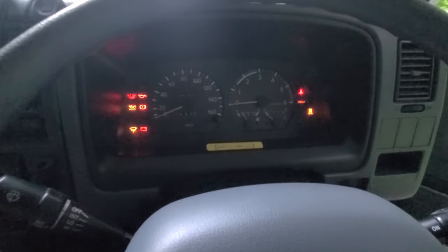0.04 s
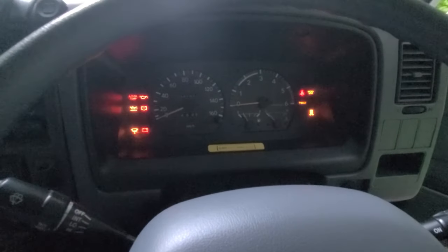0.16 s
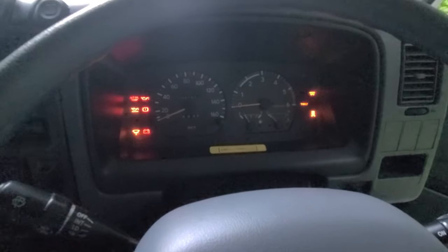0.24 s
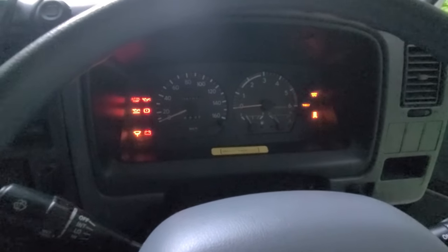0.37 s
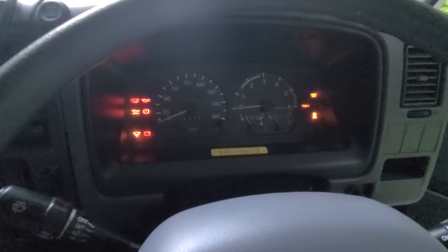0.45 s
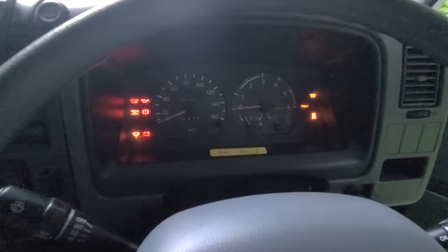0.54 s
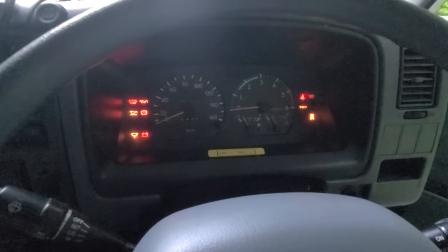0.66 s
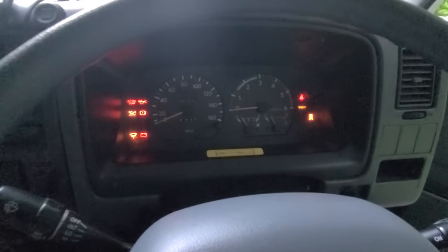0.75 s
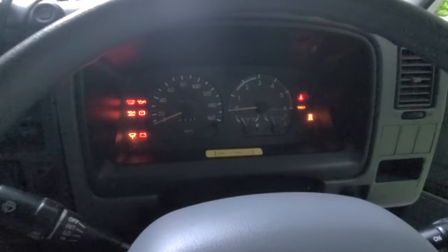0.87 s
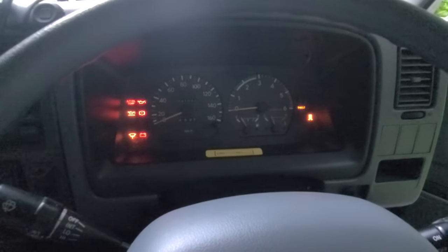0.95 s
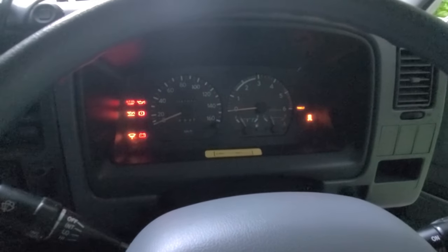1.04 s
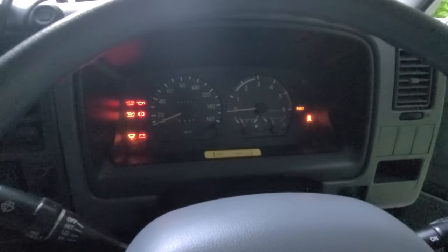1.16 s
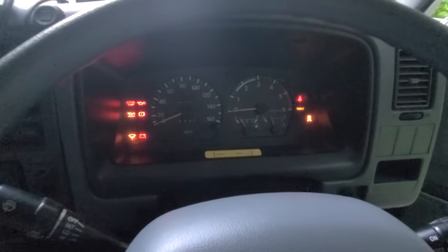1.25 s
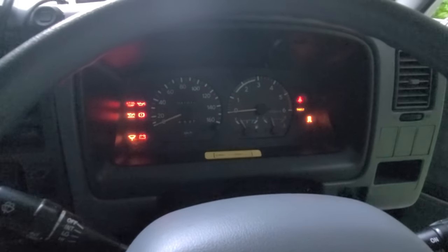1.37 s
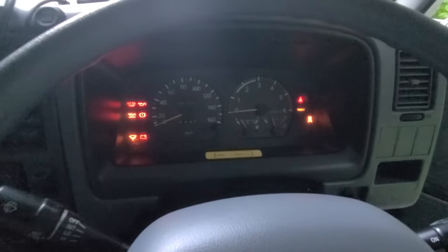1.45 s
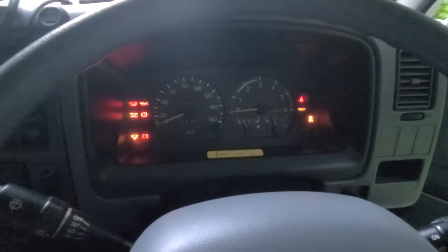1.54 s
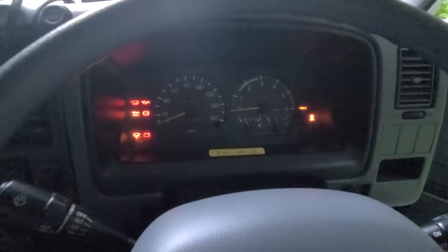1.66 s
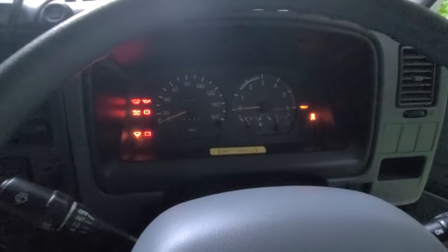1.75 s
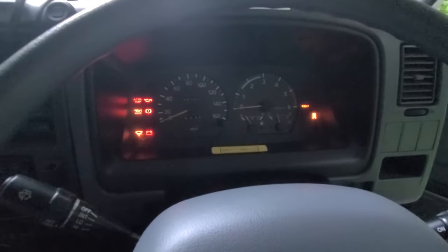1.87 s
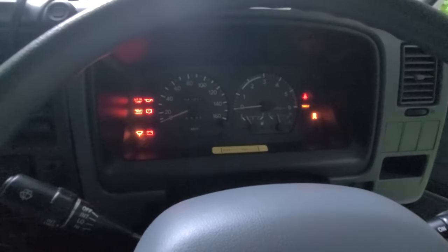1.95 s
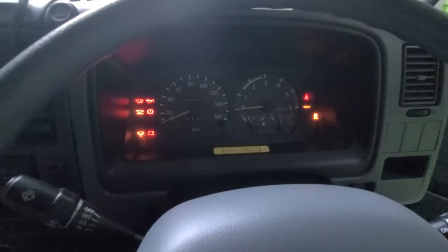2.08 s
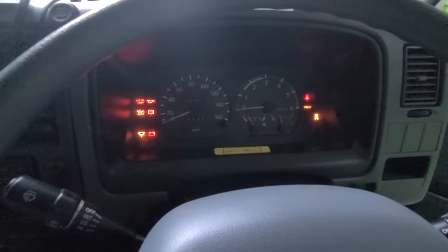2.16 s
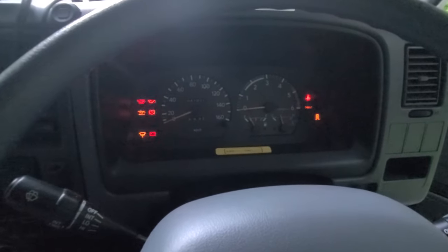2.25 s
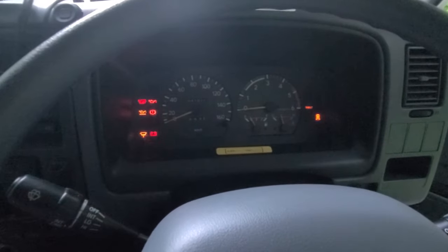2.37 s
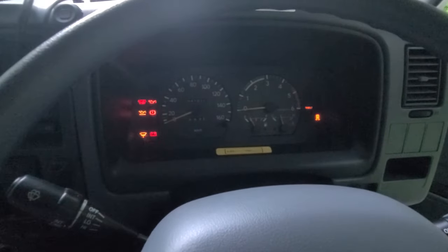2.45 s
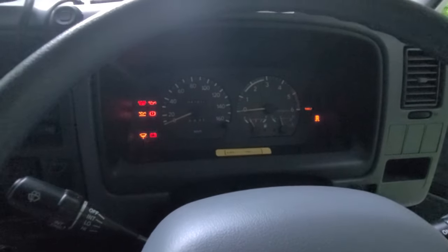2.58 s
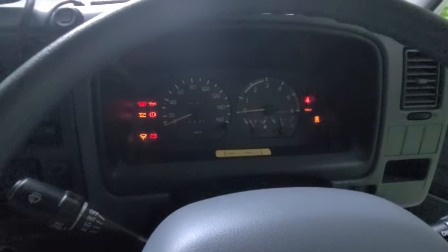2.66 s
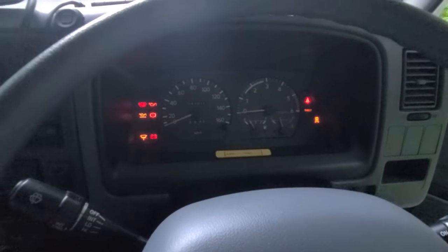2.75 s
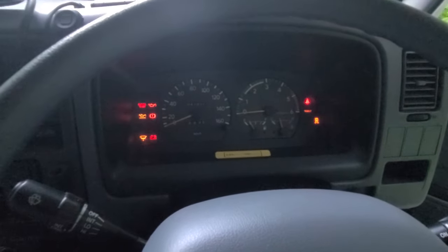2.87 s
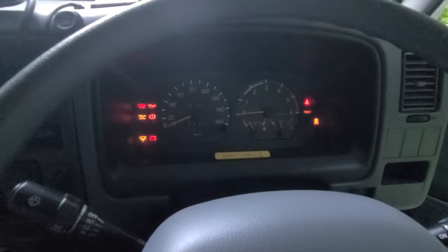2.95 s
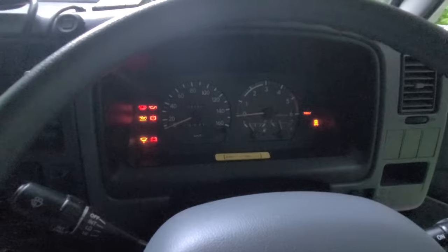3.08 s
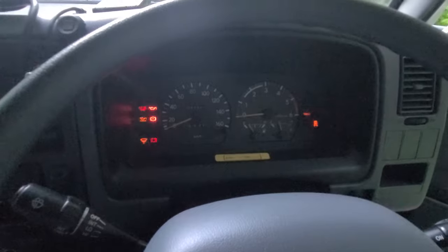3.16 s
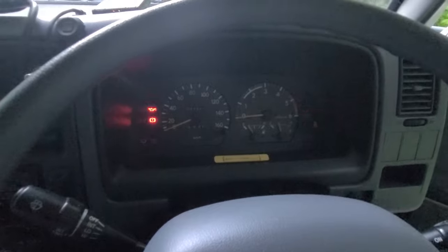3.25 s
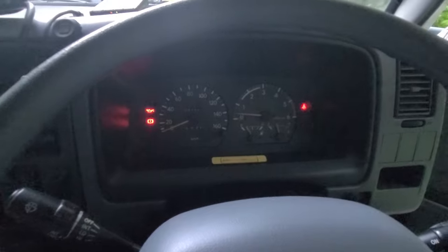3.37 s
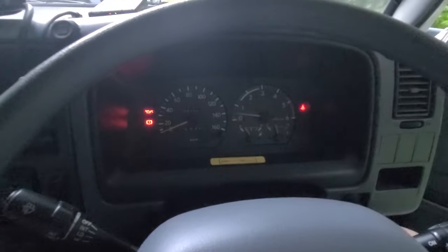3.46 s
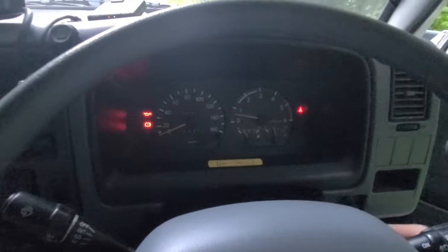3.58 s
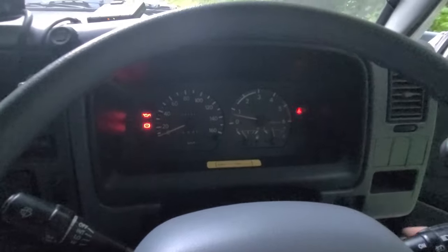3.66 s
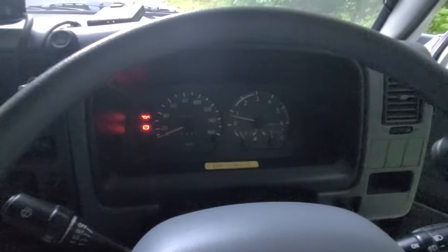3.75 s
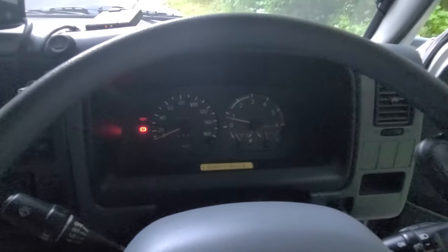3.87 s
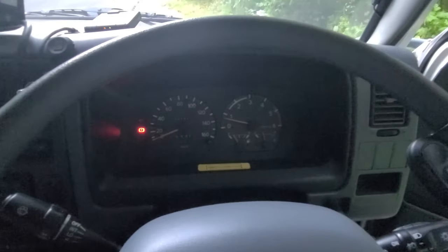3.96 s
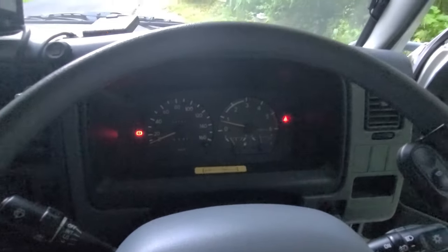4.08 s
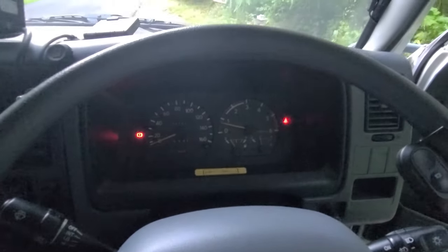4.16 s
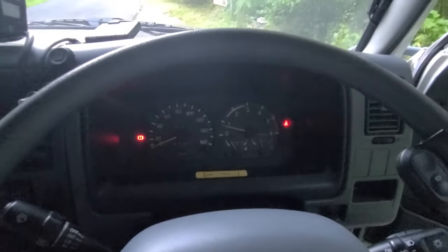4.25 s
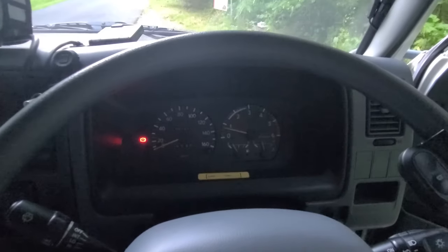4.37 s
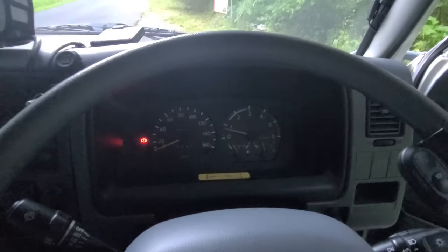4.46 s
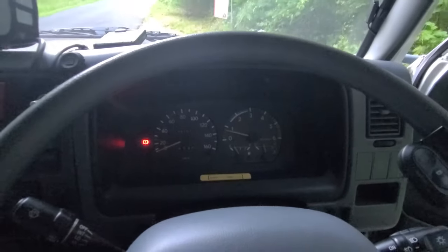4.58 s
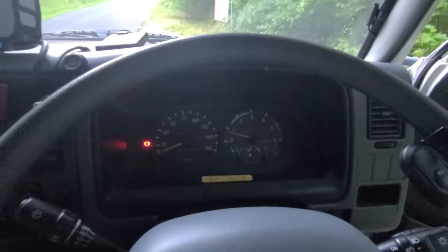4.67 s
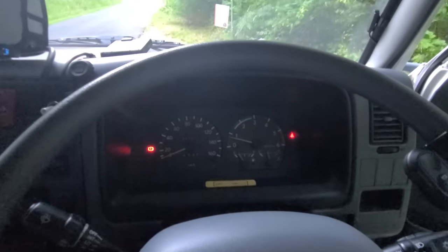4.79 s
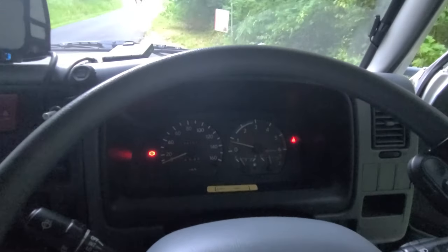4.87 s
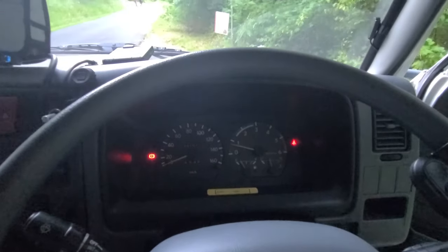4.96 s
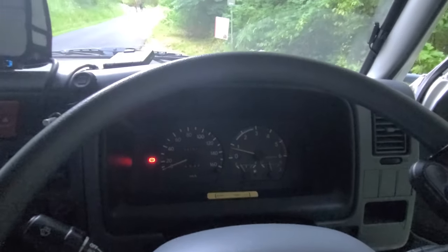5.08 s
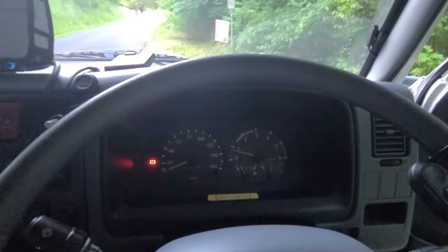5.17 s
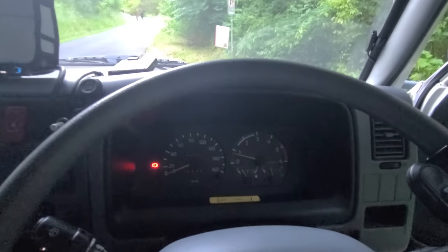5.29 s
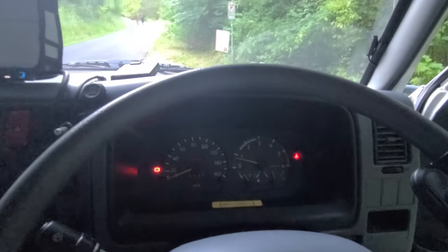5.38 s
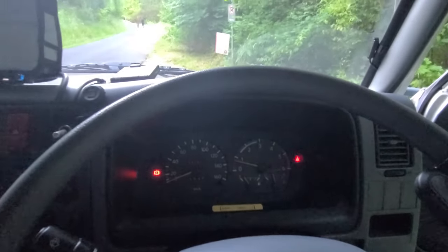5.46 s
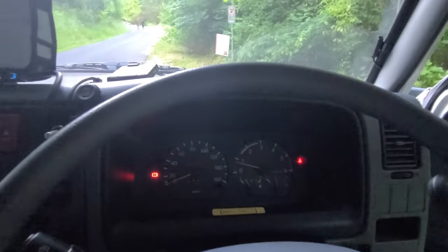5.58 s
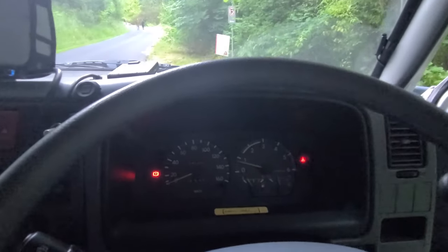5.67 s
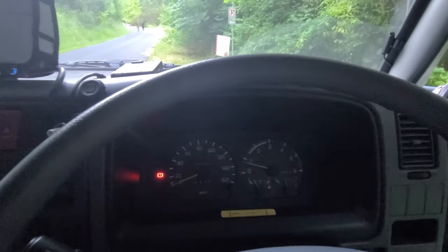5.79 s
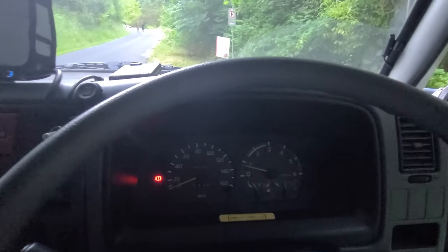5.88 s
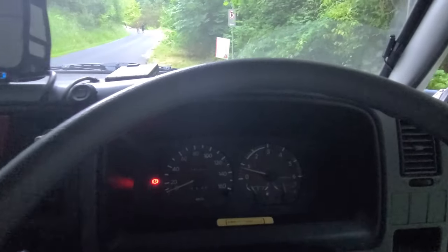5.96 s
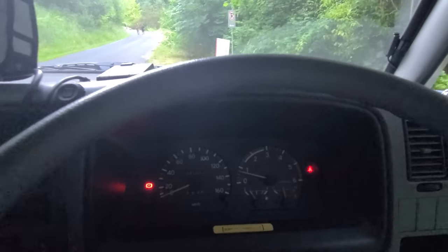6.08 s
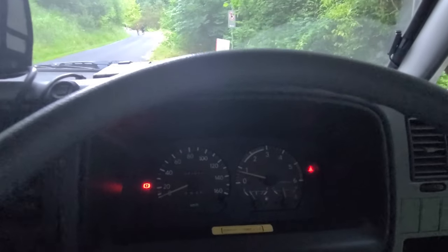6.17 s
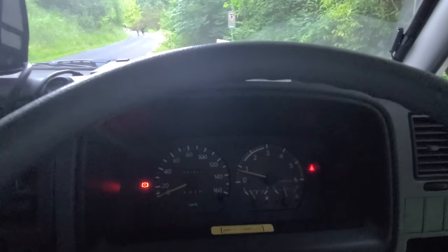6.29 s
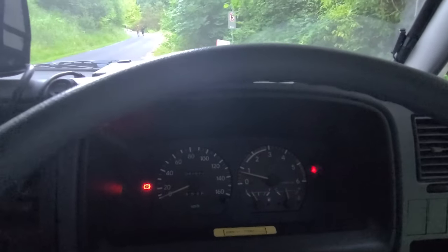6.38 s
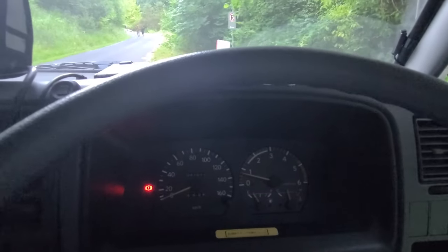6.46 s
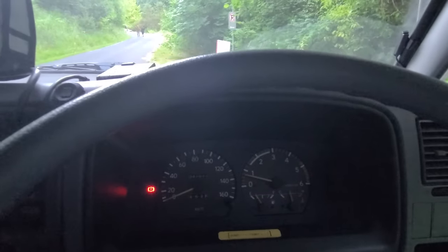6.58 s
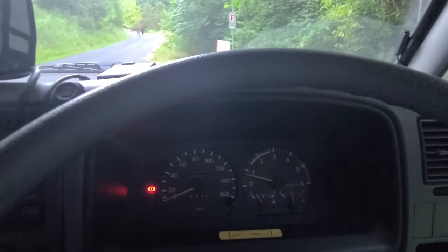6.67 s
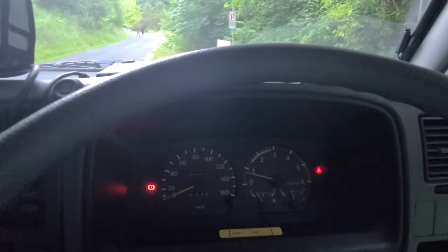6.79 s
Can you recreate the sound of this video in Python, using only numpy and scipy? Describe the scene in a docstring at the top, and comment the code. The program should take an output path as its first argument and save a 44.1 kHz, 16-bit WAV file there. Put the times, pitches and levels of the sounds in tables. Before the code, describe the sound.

The sound is close, inside a diesel truck cab. For the first 2.2 seconds it is quiet: faint low rumble, a barely audible, very high thin tone, small clicks and soft bumps on plastic near 0, 0.1, 1.1 and 2 seconds, light key clinks, and faint arched bird whistles outside. At about 2.25 the starter engages with a clack and grinds in slow, growling surges that quicken. Around 3.0 the engine catches with a deep boom and a short, wavering drone, sagging slightly before a burst of clatter at 3.3. At 3.5 the key snaps back with a very sharp, loud click and a bright jingle. The starter's raspy whirr fades until nearly 5 seconds. A steady booming idle throbs about 25 times a second, with irregular metallic knocks. At 5.7 rumble and clatter soften, and the low idle continues to the end at about 6.8.

```python
"""Inside the cab of a diesel truck, quiet rumble (shaped noise) and a very high thin tone (one sine) come first.
Clicks and bumps (dying noise and tones), clinking keys (ringing sines) and a bird (gliding sines) join in.
The starter grinds in surges: noise pulsed at the rate of its gear teeth. The engine catches with a boom and a
drone, built from multiples of its firing rate, and noise pulsed by the firings adds rumble and clatter.
The key snaps back with a sharp click, the starter spins down, and the booming idle later softens."""
import sys
import numpy as np
from scipy import signal
from scipy.fft import rfft, irfft, next_fast_len
from scipy.io import wavfile
from scipy.ndimage import map_coordinates

SR = 44100
rng = np.random.default_rng(int(sys.argv[2]) if len(sys.argv) > 2 else 0)


def master_out(mix):
    """Clip the mix to full scale and print it as 16-bit PCM to the path in sys.argv[1]."""
    frames = np.transpose(np.atleast_2d(mix))
    ceiling = np.clip(frames, -1, 1)
    pcm = np.round(ceiling * 32767).astype(np.int16)
    wavfile.write(sys.argv[1], SR, pcm)


N = 301195
T = np.arange(N) / SR  # time of every sample, s
HZ = np.fft.rfftfreq(N, 1 / SR)


def amp(db):
    """Turns decibels into a plain multiplier."""
    return 10 ** (np.asarray(db) / 20)


def evened(x):
    """Scales a sound to an average strength (rms) of 1."""
    return x / np.sqrt(np.mean(x ** 2) + 1e-20)


def read(points, hz):
    """Reads a table of values by frequency, with straight lines between points on a log axis."""
    f, value = np.transpose(points)
    return np.interp(np.log(hz + 1), np.log(f + 1), value)


def curves(rows):
    """Draws each column of a table as a curve over time; the first column is the time."""
    s, *columns = np.transpose(rows)
    return [np.interp(T, s, column) for column in columns]


def ramp(start, end):
    """Rises from 0 to 1 between two times."""
    return np.clip((T - start) / max(end - start, 1e-3), 0, 1)


def colour(x, spectrum):
    """Filters a sound by a table of levels by frequency, then evens it to rms 1."""
    size = next_fast_len(len(x))
    gain = amp(read(spectrum, np.fft.rfftfreq(size, 1 / SR)))
    return evened(irfft(rfft(x, size) * gain, size)[:len(x)])


def wander(per_s):
    """Smooth random drift of rms 1, with this many random points a second."""
    points = rng.standard_normal(4096)
    return evened(map_coordinates(points, [T * per_s], order=1, mode="mirror"))


def grit(count, spread_db):
    """Rough noise whose loudness jumps at random every 32 samples."""
    jumps_db = spread_db * np.repeat(rng.standard_normal(count // 32 + 1), 32)[:count]
    return rng.standard_normal(count) * amp(jumps_db)


def ring(x, hz, width):
    """One resonance: it rings at hz, and dies faster the wider it is; rms 1."""
    pole = np.exp((2j * hz - width) * np.pi / SR)
    return evened(signal.lfilter([1], [1, -pole], x).real)


def body(x, modes):
    """A solid part ringing at several resonances at once, at rms 1."""
    return evened(sum(amp(db) * ring(x, hz, width) for hz, width, db in modes))


def add(mix, s, sound):
    """Mixes a sound in at a time."""
    part = mix[max(round(s * SR), 0):][:len(sound)]
    part += sound[:len(part)]


# tone of the quiet cab: pitch_hz [Hz], relative_level_db [dB]
CAB_TONE = [(15, -32), (28, -5.5), (48, 3.5), (80, -9.5), (138, 3), (190, -13), (280, -14), (480, -14.5),
            (850, -16), (1400, -27), (2000, -31.5), (4800, -42.5), (7000, -34.5), (8400, -57.5),
            (13000, -39), (15500, -37)]
# the quiet cab grows a little louder before the start: time_s [s], level_db [dB, before the trim]
CAB_LEVEL = [(0.75, -65.5), (1.26, -60.5), (1.9, -60.5), (2.2, -56)]


def cab(trim_db=2):
    """Low outdoor rumble and faint hiss in the cab: steady noise, filtered."""
    noise = colour(rng.standard_normal(N), CAB_TONE)
    return amp(curves(CAB_LEVEL)[0] + trim_db) * noise


# slow level changes of the whistle: time_s [s], level_db [dB, before the trim]
WHISTLE_LEVEL = [(0.05, -53), (0.28, -74), (0.45, -58.5), (1.3, -65), (1.55, -80), (2.0, -53.5),
                 (2.25, -58), (2.45, -87), (3.3, -76), (3.45, -55), (3.75, -68), (5.1, -66.5),
                 (5.35, -55.5), (6.75, -59.5)]
WHISTLE_HZ = 15735  # middle of its slight drift


def whistle(trim_db=-1, unsteady_db=3, changes_per_s=12):
    """A very high thin electronic tone: one sine with slow level changes and small random unsteadiness."""
    db = curves(WHISTLE_LEVEL)[0] + trim_db + unsteady_db * wander(changes_per_s)
    hz = WHISTLE_HZ + 4 * wander(20)
    return np.sqrt(2) * amp(db) * np.sin(2 * np.pi * np.cumsum(hz) / SR)


# clicks of the lock and the cab's plastic:
# start_s [s], knock_db [dB], snap_db [dB], tick_db [dB], t60_s [s to fall 60 dB]
CLICKS = [(0.002, -38, -42, -42, 0.14), (0.085, -44.5, -42.5, -43.5, 0.086),
          (1.076, -45.5, -41.5, -47, 0.098), (1.198, -50.5, -71, -54.5, 0.057),
          (2.024, -64, -56, -73, 0.053), (2.115, -79, -60.5, -68, 0.069), (2.164, -70, -63, -61, 0.049),
          (2.236, -51, -43, -48, 0.14), (2.273, -43.5, -40.5, -44.5, 0.28), (3.501, -39, -32, -32, 0.07),
          (3.518, -20.5, -9.5, -26, 0.027), (3.521, -24.5, -19, -24, .085), (3.541, -51, -26.5, -18, 0.097),
          (4.181, -51, -42, -50, 0.09), (4.428, -65, -48, -50.5, .05), (5.441, -73, -58, -54, 0.13),
          (5.666, -69, -53, -60, 0.084)]
# tones of a click's three parts, low to high: pitch_hz [Hz], relative_level_db [dB]
KNOCK_TONE = [(60, -27), (200, -7.5), (480, -6), (800, -5), (1100, -2.5), (1500, -24.5), (4000, -31)]
SNAP_TONE = [(400, -12), (1000, -6.5), (1300, -10), (1700, 0.5), (2200, -3), (2650, -4.5), (3400, -2),
             (4600, -8), (6000, -4), (7400, -7.5), (8500, -25.5), (16000, -23)]
TICK_TONE = [(1500, -35), (4000, -23), (6000, -13.5), (7500, -0.5), (8500, -21.5), (10200, 4), (11500, 0),
             (12800, 6), (14600, 0), (15500, 14.5), (16200, -3)]
# resonances of the lock and its plastic shroud: pitch_hz [Hz], width_hz [Hz], relative_level_db [dB]
LOCK = [(623, 60, -2), (1583, 27, 2), (1725, 24, 5.5), (2055, 45, 3.5), (2470, 28, 0.5), (3044, 21, 3.5),
        (3635, 43, 6.5), (4440, 97, 4.5), (4600, 54, -7), (4800, 25, -14), (6060, 74, 7), (6220, 45, -7),
        (7340, 87, -1), (7200, 41, -15)]
# ringing tones of the key blades: pitch_hz [Hz], relative_level_db [dB], t60_s [s to fall 60 dB]
KEY_BLADES = [(7709, -22, .07), (10060, -22, .09), (10370, -23, .15), (12660, -8, .07), (12736, 0, .085),
              (14265, -8, .09), (15480, -15, .08)]
# the hanging keys strike one another:
# start_s [s], tick_db [dB], blade_ring_db [dB], split_ring_db [dB]
CLINKS = [(0.119, -60, -52, -78), (0.156, -40.5, -61, -60.5), (1.047, -51, -63, -75),
          (1.286, -46.5, -55, -66), (1.351, -43, -58, -80), (3.544, -29.5, -13, -45),
          (3.583, -31, -48, -71), (3.655, -47, -48, -51.5), (3.705, -57, -56, -80), (3.812, -60, -66, -80)]
SHAKEN_KEYS_DB = -21  # ring of the hanging keys against the tick of the click that shakes them
CLINK_T60, CLINK_SNAP_DB = 0.061, -25  # s to fall 60 dB; snap against tick
SPLIT_RING_HZ, SPLIT_RING_T60 = 11290, 0.43


def clicks(rise_s=0.0013, lock_db=-2, crack=0.34, crack_s=0.00085, grain_db=2.0):
    """A click is dying noise plus a ringing lock, and it shakes the keys; a clink rings blades and split ring."""
    out, t = np.zeros(N), np.arange(SR // 2) / SR
    rise = 1 - np.exp(-t / rise_s)
    snap = 1 + crack * np.exp(-t / crack_s)  # a brief extra crack at the start
    keys = sum(amp(db - 60 * t / t60) * np.sin(2 * np.pi * hz * t) for hz, db, t60 in KEY_BLADES)
    split_ring = amp(-60 * t / SPLIT_RING_T60) * np.sin(2 * np.pi * SPLIT_RING_HZ * t)
    for s, knock_db, snap_db, tick_db, t60 in CLICKS:
        parts = ((knock_db, KNOCK_TONE), (snap_db, SNAP_TONE), (tick_db, TICK_TONE))
        noise = sum(amp(db) * colour(grit(len(t), grain_db), tone) for db, tone in parts)
        lock = amp(snap_db + lock_db) * body(rng.standard_normal(len(t)), LOCK)
        click = (noise + lock) * snap * amp(-60 * t / t60)
        add(out, s, rise * (click + amp(tick_db + SHAKEN_KEYS_DB) * keys))
    for s, tick_db, keys_db, ring_db in CLINKS:
        noise = colour(grit(len(t), grain_db), TICK_TONE)
        noise = noise + amp(CLINK_SNAP_DB) * colour(grit(len(t), grain_db), SNAP_TONE)
        tick = noise * snap * amp(tick_db - 60 * t / CLINK_T60)
        add(out, s, rise * (tick + amp(keys_db) * keys + amp(ring_db) * split_ring))
    return out


# dull bumps on the cab trim: start_s [s], level_db [dB], pitch_hz [Hz], t60_s [s to fall 60 dB]
BUMPS = [(0.006, -38.5, 440, 0.11), (0.017, -29.5, 76.4, 0.16), (0.02, -35, 189, 0.1),
         (0.094, -30, 116, 0.067), (0.1, -36.5, 205, 0.11), (1.199, -40, 539, 0.063),
         (1.718, -40, 587, 0.044), (1.762, -46, 546, 0.039), (2.027, -42.5, 583, 0.083),
         (2.116, -44, 570, 0.062), (2.64, -27.5, 110, 0.088), (2.674, -29, 538, 0.043),
         (3.964, -33, 617, 0.071)]


def bumps(second_tone_t60=0.026, second_tone=0.97, second_tone_db=-5, puff_db=-4, rise_s=0.005):
    """Soft blows on plastic trim: a tone, a slightly lower one beside it and a dull puff of noise."""
    out, t = np.zeros(N), np.arange(SR // 3) / SR
    for s, db, hz, t60 in BUMPS:
        main = np.sin(2 * np.pi * hz * t)
        # the second tone dies by its own t60 on top of the bump's
        second = amp(second_tone_db - 60 * t / second_tone_t60) * np.sin(2 * np.pi * hz * second_tone * t)
        band = signal.butter(2, [hz / 2, 1.4 * hz], "band", fs=SR, output="sos")
        puff = evened(signal.sosfilt(band, rng.standard_normal(len(t))))
        shape = amp(db - 60 * t / t60) * (1 - np.exp(-t / rise_s))
        add(out, s, shape * (main + second + amp(puff_db) * puff))
    return out


# bird calls: start_s [s], length_s [s], top_pitch_hz [Hz, before the quaver], level_db [dB, before the flutter]
BIRD_CALLS = [(0.101, .23, 1800, -64), (0.556, 0.22, 1805, -61.5), (1.052, 0.17, 1780, -62),
              (1.843, 0.19, 1810, -61)]
BIRD_ARCH, BIRD_SKEW = 0.22, .62  # each call arches up by this share of its top pitch, early in the call


def bird(flutter=0.39, quaver=0.032, swell=.7):
    """Faint arched whistles from outside: gliding sines, loudest at the top of the arch."""
    out = np.zeros(N)
    waver = 1 + quaver * wander(300)
    level = 1 + flutter * wander(90)
    for start, length, top_hz, db in BIRD_CALLS:
        arch = np.maximum(np.sin(np.pi * ramp(start, start + length) ** BIRD_SKEW), 0)
        hz = top_hz * (1 - BIRD_ARCH * (1 - arch)) * waver
        out += amp(db) * arch ** swell * level * np.sin(2 * np.pi * np.cumsum(hz) / SR)
    return out


# engine speed as it cranks, flares and falls to idle: time_s [s], speed_per_s [firings per second]
ENGINE_SPEED = [(2.25, 3.0), (2.8, 7.0), (2.9, 15.0), (3.0, 32.0), (3.1, 31.5), (3.24, 26.8), (3.4, 25.21),
                (3.5, 25.03), (3.9, 25.26), (5.25, 25.26), (5.6, 25.1), (6.83, 25.14)]
TOP_CENTRE_S = 3.4635  # a moment at which a cylinder fires


def firings():
    """Adds up the engine speed into a running count of firings, whole at each top centre."""
    turns = np.cumsum(curves(ENGINE_SPEED)[0]) / SR
    return turns - np.interp(TOP_CENTRE_S, T, turns)


# surges of load on the starter, from the first bite to the first firings:
# start_s [s], length_s [s], thud_db [dB], growl_db [dB], rasp_db [dB], all before the mixing levels in starter()
SURGES = [(2.297, 0.019, -33.5, -32.5, -44.5), (2.34, 0.076, -36, -44.5, -49),
          (2.485, 0.07, -45, -38.5, -47), (2.549, 0.043, -33.5, -36.5, -45.5),
          (2.688, 0.051, -28.5, -36.5, -45), (2.831, 0.045, -35.5, -36.5, -44),
          (2.996, 0.034, -32, -37, -51), (3.207, 0.011, -38, -36.5, -56), (3.241, 0.047, -36, -41, -43.5)]
# a surge rises quickly; the gears fall back fast, the cab's thud more slowly
SURGE_RISE_S, GEARS_FALL_DB_PER_S, THUD_FALL_DB_PER_S = .014, 276, 128
# between surges, while cranking and once the engine pulls the starter along: thud, growl, rasp in dB
CRANKING_DB, OVERRUN_DB = (-48, -51, -60.5), (-30.5, -43, -50)
OVERRUN_S, OVERRUN_OVER_S, RUN_DOWN_S, RUN_DOWN_DB = 2.85, 0.11, 3.298, -8


def starter_load():
    """Thud, growl and rasp levels in dB: each surge rises, holds and falls back to the steady grind."""
    overrun = ramp(OVERRUN_S, OVERRUN_S + OVERRUN_OVER_S)
    run_down = RUN_DOWN_DB * ramp(RUN_DOWN_S, RUN_DOWN_S + 0.11)
    power = [amp(slow + (fast - slow) * overrun + run_down) ** 2
             for slow, fast in zip(CRANKING_DB, OVERRUN_DB)]
    for start, length, *levels in SURGES:
        rise = ramp(start, start + SURGE_RISE_S)
        since = np.clip(T - start - length, 0, 1)
        thud = rise * amp(-THUD_FALL_DB_PER_S * since)
        gears = rise * amp(-GEARS_FALL_DB_PER_S * since)
        shapes = (thud, gears, gears)
        power = [p + (amp(db) * shape) ** 2 for p, db, shape in zip(power, levels, shapes)]
    return 10 * np.log10(power)


# tones of the cab's thud, the gears' growl, and their rasp while cranking and then freewheeling:
# pitch_hz [Hz], relative_level_db [dB]
THUD_TONE = [(15, -14), (35, -1), (55, 3.5), (80, -3.5), (120, -9.5), (170, -15), (260, -23), (600, -73.5)]
GROWL_TONE = [(100, -27), (190, -4), (250, -20), (320, 2), (380, 2), (450, -5), (530, -4), (700, -7.5),
              (880, -11.5), (1030, -7.5), (1300, -24), (2200, -50)]
CRANKING_RASP = [(760, -31), (1300, 2.5), (1570, -3.5), (1690, 6.5), (1840, -11), (2000, 0.5), (2420, -8.5),
                 (3210, -4), (3490, -7), (4680, -13.5), (5540, -20.5), (6830, -12), (7920, -41),
                 (13200, -26), (16000, -39)]
FREEWHEEL_RASP = [(760, -33), (1300, -1.5), (1660, -0.5), (2130, 0.5), (2290, -1.5), (2420, -6), (2830, -3),
                  (3920, -2), (4400, -9.5), (5310, -10.5), (6550, -4.5), (8430, -26.5), (11900, -11.5),
                  (15000, -14), (16000, -20)]
# resonances of the housing, and of the pinion and flywheel: pitch_hz [Hz], width_hz [Hz], relative_level_db [dB]
HOUSING = [(193.6, 9, -8.5), (316.6, 15, -1), (356.5, 6.6, 1), (522.6, 22, -0.5), (666, 14, -11),
           (813, 26, -9.5), (940, 28, -11), (1021, 20, -4.5), (1230, 10, -26), (1670, 37, -14)]
GEARS = [(1930, 18, 0), (2080, 30, -3), (2670, 16.4, -5.5), (3070, 40, -10), (3190, 26, 2), (3846, 55, 1.5),
         (4110, 50, -32), (4270, 30, -2), (4680, 37, -4)]
# the starter engages, the engine catches, and the freed starter takes this long to spin down (s)
STARTER_S, CATCH_S, SPIN_DOWN_S = 2.25, 2.99, 1.64


def starter(turns, levels, teeth=57, thud_db=-1, growl_db=-3.0, housing_db=-3, rasp_db=1, gears_db=-4,
            bite=0.4, kick=0.33):
    """Gear teeth pulse the noise as the pinion grinds, loudest against each compression; then it freewheels."""
    thud, growl, rasp = levels
    mesh = np.exp(bite * np.cos(2 * np.pi * (teeth * turns + 0.31 * wander(60))))
    free = ramp(CATCH_S, CATCH_S + 0.028)
    kicks = 1 + kick * free * np.cos(2 * np.pi * turns)  # the firings jolt the gears
    growling = amp(growl_db) * colour(mesh * grit(N, 2.6), GROWL_TONE)
    ringing = amp(housing_db) * body(mesh * grit(N, 3.0), HOUSING)
    grind = amp(growl) * kicks * (growling + ringing)
    chatter = mesh * grit(N, 2.0)
    hiss = (1 - free) * colour(chatter, CRANKING_RASP) + free * colour(chatter, FREEWHEEL_RASP)
    scrape = amp(rasp) * (amp(rasp_db) * hiss + amp(gears_db) * body(mesh * grit(N, 5.5), GEARS))
    shake = amp(thud + thud_db) * colour(rng.standard_normal(N), THUD_TONE)
    low = (grind + shake) * (1 - ramp(RUN_DOWN_S, RUN_DOWN_S + .12))
    high = scrape * (1 - ramp(RUN_DOWN_S, RUN_DOWN_S + SPIN_DOWN_S))
    return ramp(STARTER_S, STARTER_S + 0.02) * (low + high)


def whine(turns, growl, teeth=57, level_db=-8, waver=.4):
    """The gear mesh sings at the tooth rate while the starter is loaded, following its growl."""
    tone = np.cos(2 * np.pi * (teeth * turns + 0.27 * wander(60)))
    fade = ramp(STARTER_S, OVERRUN_S) * (1 - ramp(OVERRUN_S, CATCH_S))
    return amp(growl + level_db) * (1 + waver * wander(50)) * tone * fade


# the drone as the engine catches: firing_multiple [times the firing rate], level_db [dB, before waver and fade]
DRONE = [(6, -37.5), (9, -40.5), (11, -40), (12, -39)]


def catch(turns, start_s=2.96, t60=1.43, waver=0.26):
    """The engine races as it catches: wavering multiples of the firing rate drone and die away."""
    drone = sum(amp(db) * (1 + waver * wander(40)) * np.cos(2 * np.pi * (round(k) * turns + rng.random()))
                for k, db in DRONE)
    fade = amp(-60 * np.maximum(T - start_s, 0) / t60)
    return np.sqrt(2) * drone * ramp(start_s, start_s + 0.026) * fade


# the fuel is cut back and the idle softens: when, how fast, and by how much in each layer
SETTLE_S, SETTLE_OVER_S = 5.68, 0.058
SETTLE_BOOM_DB, SETTLE_BLOCK_DB, SETTLE_CLATTER_DB = -1.5, -7, -5.5


def settled():
    """Goes from 0 to 1 as the idle softens."""
    return ramp(SETTLE_S, SETTLE_S + SETTLE_OVER_S)


# the boom as the engine catches, sags and takes up its idle:
# time_s [s], level_db [dB, before settling], first_multiple_db [dB against the rest]
BOOM_LEVEL = [(2.96, -37, -11), (3.02, -23.5, -8), (3.08, -24.5, -10), (3.3, -28, -25), (3.36, -26, -4.5),
              (3.48, -22.5, -6.5)]
# parts of the boom; the first row is skipped, as BOOM_LEVEL sets it:
# firing_multiple [times the firing rate], relative_level_db [dB, before upper_db and waver]
BOOM_PARTS = [(1, -5), (2, 0.5), (3, -13), (4, -17.5), (5, -23.5), (6, -21), (7, -22.5), (8, -28),
              (9, -47.5), (10, -35), (11, -35), (12, -32), (13, -44.5), (14, -39)]


def boom(turns, waver=0.048, upper_waver=.4, upper_db=-2, level_db=0):
    """Low multiples of the firing rate shake the cab in step; upper ones waver in strength."""
    db, first_db = curves(BOOM_LEVEL)
    out = amp(first_db) * np.cos(2 * np.pi * turns)
    for k, part_db in BOOM_PARTS[1:]:
        k = round(k)
        if k <= 3:
            strength = amp(part_db) * (1 + waver * wander(25))
            out += strength * np.cos(2 * np.pi * k * turns)
        else:
            strength = amp(part_db + upper_db) * (1 + upper_waver * wander(14))
            out += strength * np.cos(2 * np.pi * (k * turns + rng.random()))
    level = amp(db + level_db + SETTLE_BOOM_DB * settled())
    return np.sqrt(2) * level * out * ramp(CATCH_S, CATCH_S + .055)


def swells(s, spread_s):
    """A bell-shaped curve of height 1 around a moment."""
    return np.exp(-.5 * ((T - s) / spread_s) ** 2)


# the clatter eases for a few firings: middle_s [s], spread_s [s, one standard deviation], change_db [dB]
LULLS = [(3.47, 0.044, -4.5), (3.815, 0.058, -6), (4.47, 0.025, -4), (4.898, 0.037, -11)]
# base levels of block rumble and injector clatter, and their slow random swell
BLOCK_DB, CLATTER_DB, SWELL_DB, SWELLS_PER_S = -37, -52, 0.6, 6
# a shot of extra fuel: when, fading time in s, dB on the block, dB on the clatter
FUEL_S, FUEL_FADE_S, FUEL_BLOCK_DB, FUEL_CLATTER_DB = 3.287, 0.046, 6.5, 15


def load():
    """Block and clatter levels in dB: a shot of fuel, a gently swelling idle, then a softer one."""
    fuel = np.exp(-np.maximum(T - FUEL_S, 0) / FUEL_FADE_S)
    swell = SWELL_DB * wander(SWELLS_PER_S)
    lulls = sum(db * swells(s, spread_s) for s, spread_s, db in LULLS)
    block_db = BLOCK_DB + FUEL_BLOCK_DB * fuel + SETTLE_BLOCK_DB * settled() + swell
    clatter_db = CLATTER_DB + FUEL_CLATTER_DB * fuel + SETTLE_CLATTER_DB * settled() + swell + lulls
    return block_db, clatter_db


# tones of the block rumble, injector clatter and fine fizz above them: pitch_hz [Hz], relative_level_db [dB]
BLOCK_TONE = [(20, -28), (70, 6), (130, 4), (185, 0), (230, -7.5), (320, -3), (450, -10), (620, -12),
              (760, -17.5), (1120, -20.5), (1300, -36.5), (2500, -29), (5000, -66)]
CLATTER_TONE = [(300, -32), (1000, -6), (1400, -3), (1750, 5.5), (2050, 8), (2400, -8), (2800, -7),
                (3500, -28), (4500, -25), (8000, -68)]
FIZZ_TONE = [(1760, -32.5), (3000, -2), (4250, -7.5), (4650, -8), (5260, -16), (6820, -5), (7770, -22),
             (9220, -57), (10000, -29), (11200, -15.5), (12100, -7), (15000, -5), (15400, 0)]
# resonances of the engine cover: pitch_hz [Hz], width_hz [Hz], relative_level_db [dB]
COVER = [(178.1, 7.9, 5.5), (301.8, 12.6, 1.5), (368, 19, -6.5), (610, 8.3, -11), (656, 2.2, -12.5),
         (1128, 8.6, -14), (1483, 6.9, -18)]
# resonances of the clatter:
# pitch_hz [Hz], width_hz [Hz], first_level_db [relative dB], settled_level_db [relative dB, softened idle]
RATTLE = [(1757, 24, -6, 3.5), (1888, 32, 0.5, -13), (1970, 8.2, -5, -3), (2110, 16, -5.5, -4),
          (2276, 50, -8, -23)]


def combustion(turns, levels, rumble_db=-3, cover_db=-7, clatter_db=-3, rattle_db=-2.0, fizz_db=-57,
               throb=0.19, uneven_db=1.5, sharp=0.6, lag=.01, muffle_hz=2800):
    """Firings pulse noise to thump the block and, with uneven force, rattle the injectors."""
    block_db, knock_db = levels
    stroke = np.floor(turns + .5).astype(int) % 512
    force = amp(uneven_db * rng.standard_normal(512))[stroke]
    burst = evened(force * np.exp(sharp * np.cos(2 * np.pi * (turns - lag))))
    thump = evened(1 + throb * np.cos(4 * np.pi * turns - 2.4))  # two throbs per firing
    rumble = amp(rumble_db) * colour(thump * grit(N, 2.3), BLOCK_TONE)
    block = rumble + amp(cover_db) * body(thump * grit(N, 1.5), COVER)
    soft = settled()
    taps = signal.lfilter(*signal.butter(2, muffle_hz, fs=SR), burst ** 2 * grit(N, 1.8))
    rattle = evened(sum(amp(first + (last - first) * soft) * ring(taps, hz, width)
                        for hz, width, first, last in RATTLE))
    clatter = amp(clatter_db) * colour(burst * grit(N, 2.8), CLATTER_TONE) + amp(rattle_db) * rattle
    # the fizz follows the clatter's level only slightly
    fizz = amp(fizz_db + 0.14 * (knock_db - knock_db.mean())) * colour(grit(N, 3.6), FIZZ_TONE)
    return (amp(block_db) * block + amp(knock_db) * clatter + fizz) * ramp(FUEL_S, FUEL_S + 0.064)


# firings that knock harder than the rest:
# start_s [s], level_db [dB, before the trim], pitch_hz [Hz, at which the injector rings]
HARD_KNOCKS = [(3.738, -45, 1900), (3.892, -46.5, 1900), (4.012, -46, 2000), (4.09, -41.5, 1920),
               (4.303, -49, 1900), (4.527, -43.5, 1890), (4.727, -42.5, 1920), (5.16, -42.5, 1930),
               (5.452, -44.5, 1990), (5.997, -43, 2210), (6.24, -50, 1680), (6.438, -45, 1754),
               (6.637, -45.5, 1780)]
KNOCK_RISE_S, KNOCK_T60, KNOCK_BAND_HZ = 0.0055, .11, 244


def knocks(trim_db=4):
    """Hard firings: a narrow band of noise makes a metallic ring that rises quickly and dies away."""
    out, t = np.zeros(N), np.arange(SR // 8) / SR
    for s, db, hz in HARD_KNOCKS:
        edges = [hz - KNOCK_BAND_HZ / 2, hz + KNOCK_BAND_HZ / 2]
        band = signal.butter(2, edges, "band", fs=SR, output="sos")
        ringing = evened(signal.sosfilt(band, rng.standard_normal(len(t))))
        shape = amp(db + trim_db - 60 * t / KNOCK_T60) * (1 - np.exp(-t / KNOCK_RISE_S))
        add(out, s, shape * ringing)
    return out


# how alike the two microphone ports are: pitch_hz [Hz], likeness [0 to 1]
LIKENESS = [(60, 1), (150, 0.9), (350, 0.98), (700, 0.33), (1500, 0.31), (5000, 0.07), (14000, 0.39)]
# level difference between the ports: pitch_hz [Hz], left_minus_right_db [dB]
TILT = [(60, 1.5), (200, -0.5), (380, -1.5), (1300, -2.5), (2400, -3.5), (5000, -6.5), (8000, -3.5),
        (14000, -13.5)]
# phase difference between the ports: pitch_hz [Hz], left_lead_rad [radians, negative if the right leads]
LEAD = [(0, 0), (450, 0.54), (860, -2.4), (1720, -2.06), (3270, -6), (6000, -9), (16000, -32.5)]


def ports(direct, diffuse):
    """Two ports differ in level and phase by pitch; the cab's reflections make the treble unlike."""
    same = np.clip(read(LIKENESS, HZ), 0, 1)
    tilt = amp(read(TILT, HZ) / 2)
    shared = same * np.exp(-1j * np.interp(HZ, *np.transpose(LEAD)))
    a, b = rfft(direct), rfft(diffuse)
    left = a * tilt
    right = (shared * a + np.sqrt(1 - same ** 2) * b) / tilt
    # keeps the level of the two ports' average steady across pitch
    centre = np.sqrt(tilt ** 2 + tilt ** -2 + 2 * shared.real + 1e-3) / 2
    return irfft(np.array([left, right]) / centre, N)


def scene():
    """Mixes two random draws of the noisy sounds for width, shares the tones, and adds the whistle."""
    turns, engine_db, starter_db = firings(), load(), starter_load()

    def noises():
        """One random draw of every noisy layer."""
        return (cab() + clicks() + bumps() + starter(turns, starter_db)
                + combustion(turns, engine_db) + knocks())

    direct, diffuse = noises(), noises()
    tones = bird() + whine(turns, starter_db[1]) + catch(turns) + boom(turns)
    return ports(direct + tones, diffuse) + whistle() * amp([[-4], [2]])  # left and right, dB


EDGE_HZ = 16050  # top of the band


def record(dry):
    """Rounds off the sharpest peaks, then cuts everything above the band edge."""
    rounded = dry / (1 + (dry / .8) ** 6) ** (1 / 6)
    low_pass = signal.firwin(511, EDGE_HZ, window=("kaiser", 9), fs=SR)
    return signal.oaconvolve(rounded, low_pass[None], "same")


dry = scene()
out = record(dry)
master_out(out)
```